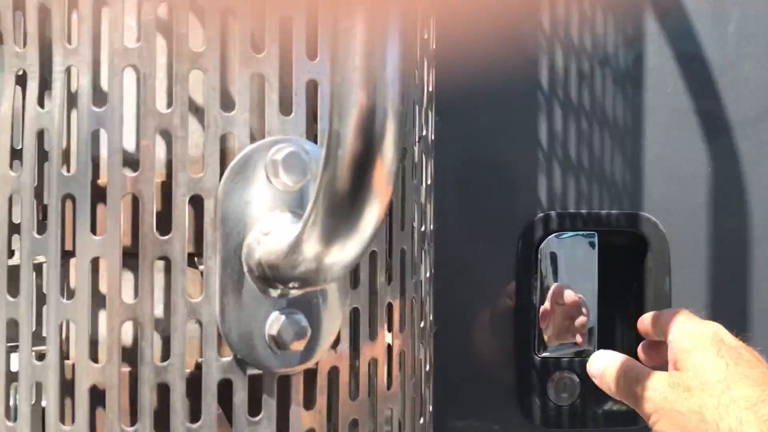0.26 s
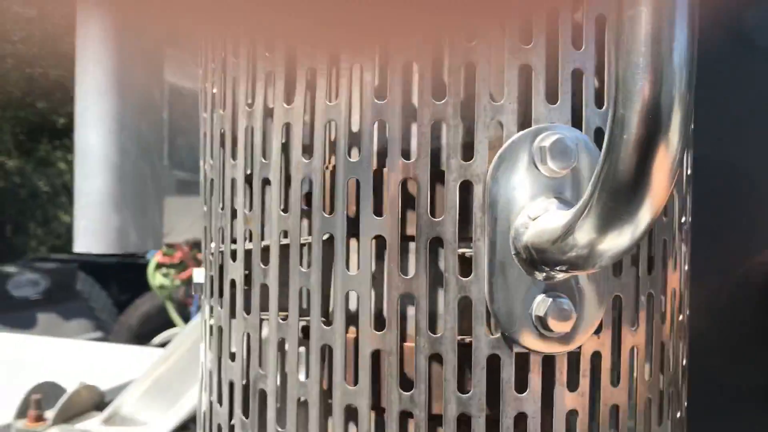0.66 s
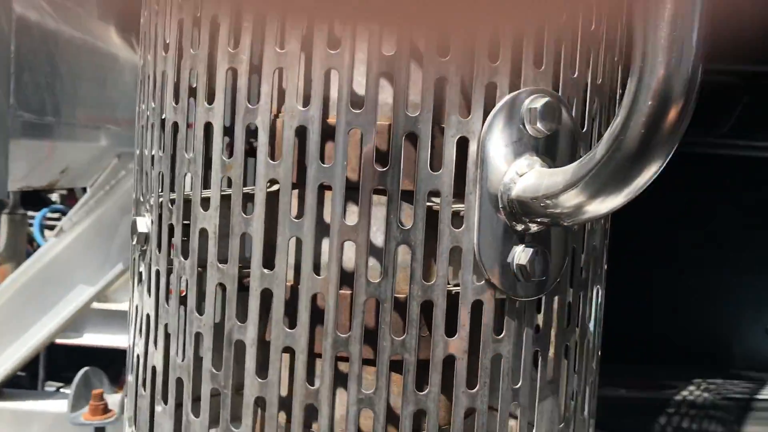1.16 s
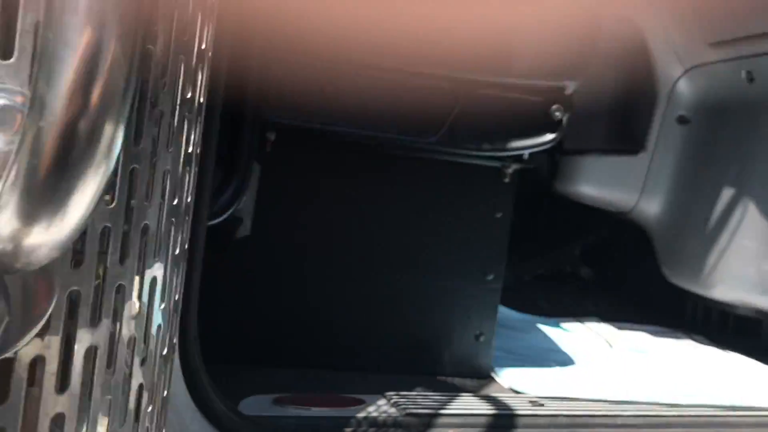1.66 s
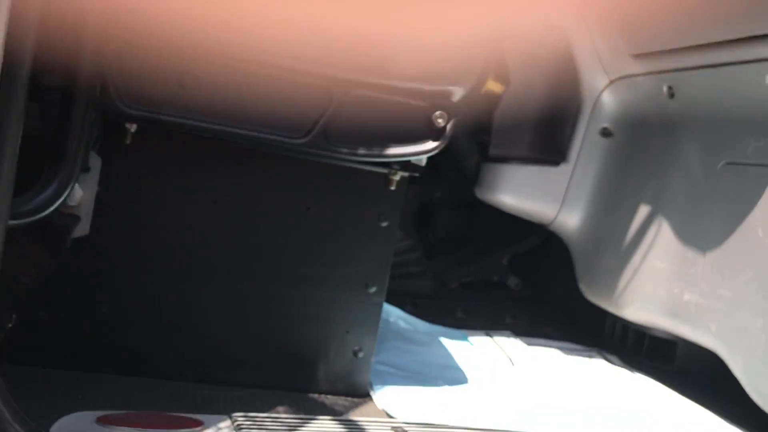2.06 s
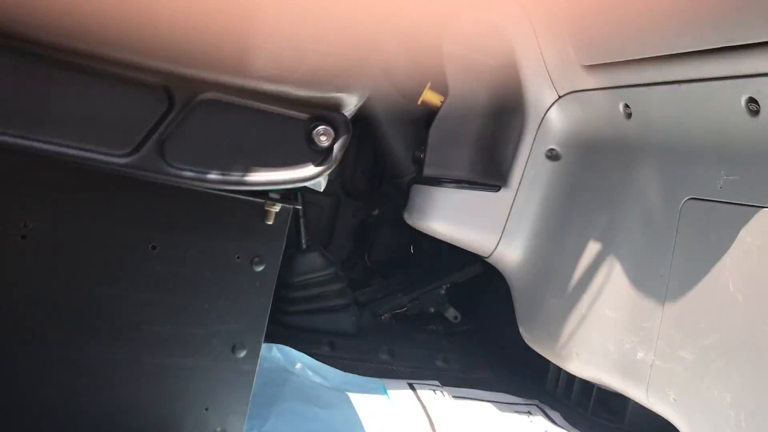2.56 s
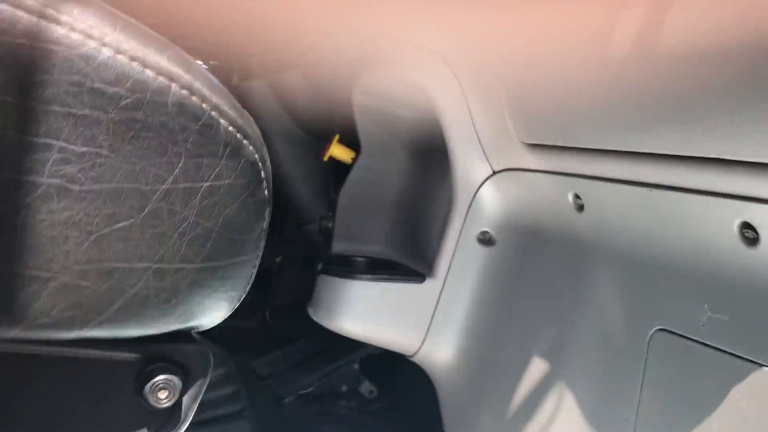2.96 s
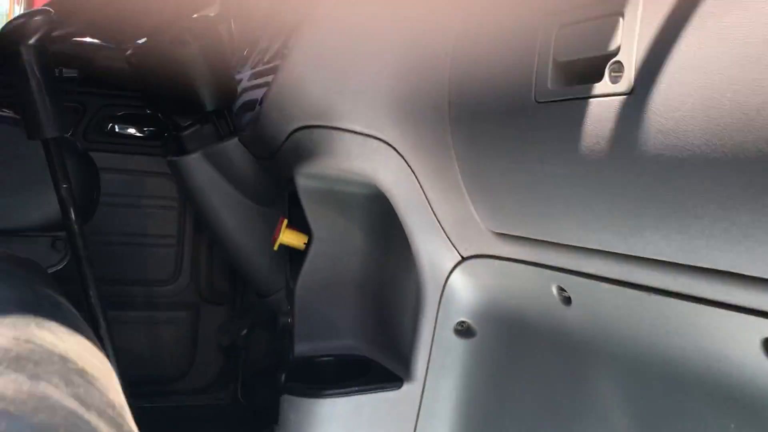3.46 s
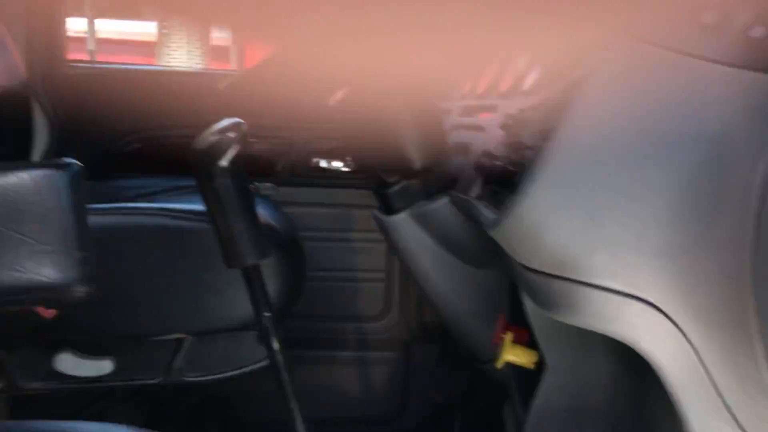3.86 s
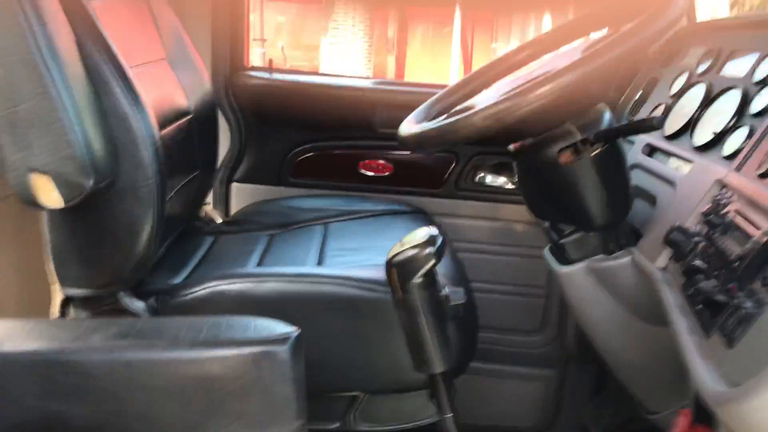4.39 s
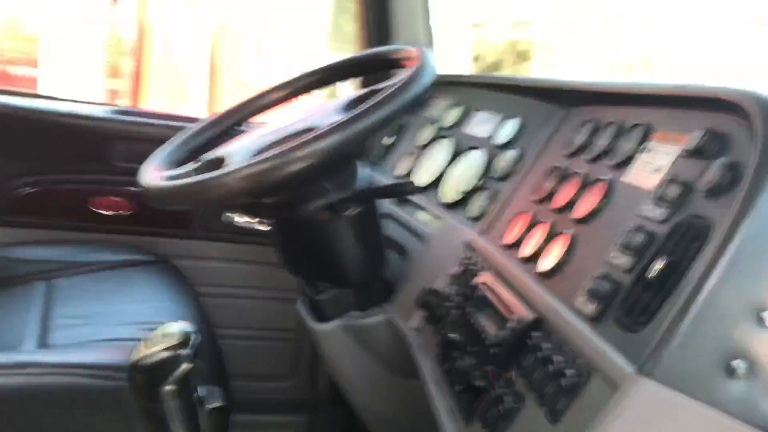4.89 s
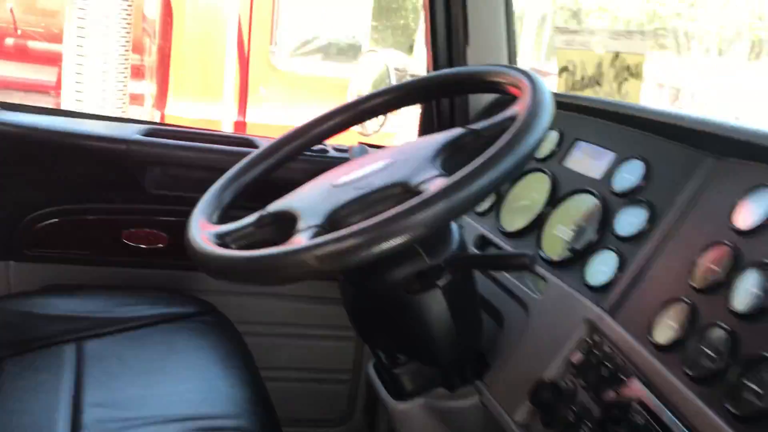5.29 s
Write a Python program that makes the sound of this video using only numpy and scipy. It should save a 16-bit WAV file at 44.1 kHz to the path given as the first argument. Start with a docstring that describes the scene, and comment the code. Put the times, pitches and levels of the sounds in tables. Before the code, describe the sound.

A phone held close hears a person open a truck door and climb in. Low outdoor rumble and soft airy wash run throughout, swelling at times and becoming duller after about 1.5 seconds. Small handle clicks come from 0.2 to 0.6, then a double dull knock near 0.73 and a faint rattle at 0.8. At 1.4 the latch grates and lets go with the loudest, bright steely clack and panel boom. A soft bump follows at 2.0, then a sharp crack at 2.3 and a short gritty scrape around 2.45 to 2.6, the metal step singing and humming on. Clothes and hand rub in uneven strokes, with clicks at 2.7. Dry seat creaks come near 3.1 and 3.5 to 3.7, a trim tap at 3.8 and a brief sole squeak at 4.05. Quieter rubbing, ticks and knocks continue until a low handling thump at 5.45.

```python
"""Climbing into a truck cab

At the open door of a truck, a hand-held phone hears the latch let go and a person climb in. Blows crack and
boom in panels, most also ringing the door steel; a hand thumps the phone at the end. A foot loads the step,
grit scrapes its steel and a sole squeaks. The seat creaks in stick and slip; after a short handle rattle,
clothes and hand rub near the phone in strokes of tiny slips. Filtered noise makes the low outdoor rumble
and wash, which grow duller on the way into the cab."""
import sys
import numpy as np
from scipy import signal
from scipy.fft import rfft, irfft
from scipy.io import wavfile
from scipy.ndimage import uniform_filter1d

SR = 44100
rng = np.random.default_rng(int(sys.argv[2]) if len(sys.argv) > 2 else 0)


def pcm_store(signal):
    """Save signal as 16-bit PCM."""
    levels = np.round(np.clip(np.atleast_2d(signal), -1, 1) * 32767)
    wavfile.write(sys.argv[1], SR, levels.astype(np.int16).T)


N = 244269
T = np.arange(N) / SR  # time in the scene, s
AGE = T[:SR // 2]  # time since a blow, s

# Levels of struck sounds are rms over their first 20 ms; a source's trim comes on top.
# knocks on door, step and cab, and a last low thump of a hand on the phone:
# start_s, panel_pitch_hz, boom_db, knock_db, hardness_db (crack over knock),
# base_t60_s (scaled in each range), door_steel_share (0-1, of power)
KNOCKS = [(0.7294, 128, -33, -34.5, -15, 0.084, 0.04), (0.7494, 178, -33, -34.5, -10, 0.035, 0),
          (1.4196, 173.8, -20, -22, -11.5, 0.063, 0.66), (1.495, 191.4, -37.5, -64, 0, 0.25, 0.1),
          (1.994, 189, -33, -46, -18.5, 0.2, 0.01), (2.0704, 114.3, -42, -51.5, -2.5, 0.14, 0.06),
          (2.305, 160.6, -31.5, -30, -20, 0.037, 0.03), (2.3114, 296, -37, -33.5, -24, 0.048, 0.4),
          (2.7524, 127.7, -34, -42.5, -11, 0.027, 0.2), (2.944, 162, -40.5, -46, -5.5, 0.04, 0.03),
          (3.451, 113.7, -41.5, -31, -17, 0.15, 0.02), (3.822, 118, -43, -43.5, -21, 0.16, 0.6),
          (4.474, 129, -53.5, -50.5, -17, 0.19, 0.3), (4.9, 107.5, -41.5, -48.5, -7, 0.18, 0),
          (4.973, 216, -52, -43.5, -9, 0.033, 0.36), (5.452, 56.3, -33.5, -48, -9, 0.068, 0.63)]
# the blows' crowded modes: pitch_hz, level_db
DOOR_TONE = [(120, -5.5), (200, 2.5), (263, -4), (401, -10.5), (482, -15.5), (590, -12), (916, -26),
             (1080, -24), (1400, -29.5), (1710, -30.5), (2470, -36.5), (2700, -32.5), (3970, -38),
             (6170, -42), (16000, -60)]
# single modes of the door steel: pitch_hz, level_db, t60_s
DOOR_MODES = [(332.2, -2.5, 0.19), (397, -0.5, 0.097), (531, -8.5, 0.14), (585, -11, 0.07),
              (695, -16, 0.087), (864, -5, 0.048), (1008, -7, 0.15), (1147, 0.5, 0.048), (1290, 0.5, 0.084),
              (1583, 1, 0.056), (1793, 4, 0.036), (1930, -8, 0.042), (2090, -30, 0.13), (2520, -28, 0.12),
              (2920, -32, 0.026), (3055, -4, 0.08), (3340, -7, 0.093), (4200, -7, 0.023), (4480, 4, 0.029),
              (6400, 2, 0.035), (6570, -3, 0.054), (7650, -19, 0.03)]
# modes of a broad panel: multiple_of_panel_pitch, level_db, t60_s
PANEL_MODES = [(.69, 0.5, 0.16), (0.972, 7, 0.22), (1.022, 1.5, 0.14), (1.249, 1, 0.16)]
KNOCK_CLACK_SHARE = 0.29  # how much of the hardness reaches the mid-range clack

# latch bolt dragging over its striker
BOLT_START_S, BOLT_LENGTH_S, BOLT_DB, BOLT_ATTACK_S, BOLT_RELEASE_T60_S = 1.402, 0.023, -38.5, 0.01, .025

# bright snaps and pitched taps of catches and trim: start_s, peak_db, centre_hz, width_hz, t60_s
SNAPS = [(0.187, -31, 1350, 686, 0.046), (0.578, -41.5, 3420, 600, 0.049),
         (1.4106, -19.5, 11100, 1760, 0.01), (1.4201, -16.5, 5540, 5030, 0.011),
         (1.4216, -19, 1720, 350, 0.049), (2.295, -32, 3960, 6900, 0.2), (2.305, -21, 11500, 4860, 0.0022),
         (2.3104, -15.5, 10200, 8000, 0.0086), (2.4617, -19.5, 2796, 1790, 0.026),
         (2.939, -32, 11800, 6050, 0.0021), (3.5705, -29.5, 4470, 7040, 0.017),
         (3.706, -34.5, 604, 248, 0.054), (3.824, -29, 1265, 350, 0.31), (4.0425, -26, 2150, 443, 0.038),
         (4.588, -39.5, 4280, 1510, 0.017), (4.7101, -33, 7500, 9000, 0.0056),
         (4.899, -32.5, 1350, 300, 0.15), (4.9005, -39, 2090, 350, 0.086)]
# small clicks of handle, latch and trim: start_s, level_db (before trim),
# brightness_db (step from each range to the next), base_t60_s (scaled in click)
CLICKS = [(0.1682, -44, -0.5, 0.11), (0.19, -44, -7.5, 0.11), (0.228, -47, 5, .044),
          (0.405, -50, -10.5, 0.068), (0.4316, -46.5, -6, 0.13), (0.5649, -46.5, -1.5, 0.045),
          (0.577, -47.5, -2, .04), (0.6713, -47.5, 0, .03), (0.786, -46.5, -8.5, .027),
          (0.965, -40, -3.5, 0.032), (1.024, -47.5, -3.5, 0.076), (1.666, -50, 1, .027),
          (1.9104, -53.5, -13.5, .039), (2.0477, -48, -10.5, 0.042), (2.1645, -49, -3, .06),
          (2.7039, -39.5, -0.5, .029), (2.7243, -39, .5, 0.071), (2.818, -43.5, -4.5, .05),
          (3.211, -46, -7, .08), (3.255, -46, -6.5, 0.051), (4.0411, -37, -6.5, .13),
          (4.6165, -48.5, -5, 0.034), (4.7097, -49.5, -9.5, .025), (4.9748, -41.5, -1, .07),
          (5.3213, -50, 0, .052)]
# tone of those clicks: pitch_hz, level_db
CLICK_TONE = [(300, -9.5), (600, 9.5), (900, 3.5), (1500, 7.5), (2600, -2), (3800, -0.5), (4800, -3.5),
              (6300, -2.5), (9000, -23.5), (12500, -20), (16000, -19)]
CLICK_TRIM_DB = -10.5

# foot on the step: arrival, level and time constant of the load
FOOTFALL_S, FOOTFALL_DB, FOOTFALL_PUSH_S = 2.412, -36.5, 0.028
# low modes of the step: pitch_hz, level_db, t60_s
STEP_MODES = [(121, 2.5, 0.52), (158.7, 5, 0.93), (215, 3.5, 1), (266, -4.5, 0.35), (339, -6, 0.62),
              (467, -11, 0.51)]
# scrape on the steel step: start_s, level_db, step_drone_db (both before trim)
SCRAPE = [(2.404, -53, -50), (2.432, -33, -33), (2.468, -25.5, -33), (2.488, -27, -31.5),
          (2.61, -52.5, -45), (2.7, -62.5, -52)]
# tone of the rasping grit: pitch_hz, level_db
SCRAPE_TONE = [(150, -13), (250, -5), (429, -3), (476, -3.5), (788, -13), (1200, -5.5), (1700, -8.5),
               (2490, -9), (4050, -23), (4650, -16.5), (7980, -29.5), (12500, -39), (16000, -41)]
# singing modes of the scraped steel: pitch_hz, level_db, t60_s
STEEL_MODES = [(1040, 7.5, 0.19), (1180, 1, 0.4), (1258, -0.5, 0.45), (1317, -17, 0.46), (1385, 1, 0.4),
               (1574, 0, .28), (1590, 4.5, .2), (1696, 7, 0.53), (1810, -1, 0.31), (1980, -8, 0.39),
               (2000, -3, 0.26), (2050, -3, 0.36), (2180, -28, .3), (2460, -10, .25), (2440, 13.5, 0.096),
               (2650, 5, 0.12), (2753, -13, 0.18), (2950, -5, 0.15), (3390, -2, 0.21), (3440, -4, 0.24)]

# a sole squeaks as it slides in: start_s, level_db (before trim)
SLIDE = [(3.965, -60), (4.0, -43.5), (4.045, -36), (4.07, -39.5), (4.12, -62)]
# resonances of the sole: pitch_hz, half_width_hz, level_db
SOLE_MODES = [(619, 9.9, -0.5), (1370, 20, 1), (2010, 81, 3.5), (3420, 47, 1), (4580, 18, -7),
              (6200, 110, -30)]

# creaks of the seat: start_s, length_s, level_db, sizzle_db (both before trim)
CREAKS = [(3.091, .062, -43.5, -55), (3.5107, .004, -39.5, -45.5), (3.5493, .004, -37.5, -44.5),
          (3.571, .004, -42, -45.5), (3.589, .004, -38, -41.5), (3.6732, .014, -40.5, -44.5),
          (3.7274, .004, -41.5, -44.5)]
# tone of one seat slip: pitch_hz, level_db
SEAT_TONE = [(350, -42), (600, 4), (779, -8), (957, -13), (1370, 5.5), (1550, -7), (1850, -3), (3390, -17),
             (5190, -7.5), (7620, -17), (9110, -11.5), (10200, -30), (16000, -15)]
# typical gap between slips, its log spread, spread of slip level, trim
SLIP_GAP_S, SLIP_JITTER, SLIP_SCATTER_DB, SLIP_TRIM_DB = .009, .2, 1, -4.5

# strokes of clothes and hand, and a first short rattle of the handle:
# start_s, length_s, pressure_db, rasp_db, hiss_db (levels before trim)
RUBS = [(0.811, 0.043, -41.5, -61, -77), (2.013, 0.24, -69, -66, -66.5), (2.332, .08, -48, -54.5, -53.5),
        (2.585, 0.028, -43, -46, -51.5), (2.71, 0.053, -36, -44, -46), (2.773, .05, -48, -54.5, -58),
        (2.956, 0.15, -57, -64.5, -66), (3.116, 0.24, -53.5, -55, -56.5), (3.544, 0.05, -41.5, -47.5, -53),
        (3.682, 0.21, -42.5, -57, -61), (3.847, 0.081, -37.5, -44.5, -52), (3.934, 0.14, -39, -48, -60),
        (4.138, 0.043, -56, -55, -59.5), (4.196, 0.81, -61, -64, -64.5), (4.405, 0.083, -59, -59, -57.5),
        (4.464, 0.031, -45, -63, -66), (5.312, 0.021, -39.5, -46, -49), (5.345, 0.13, -48, -49, -51.5)]
# tone of the strokes and rattle: pitch_hz, level_db
RUB_TONE = [(88, -33.5), (150, 2.5), (286, -14.5), (457, -11), (524, -15.5), (716, -17.5), (1120, -20),
            (1600, -22), (1830, -24.5), (2810, -32), (4950, -33), (5460, -32.5), (12400, -39.5),
            (16000, -38.5)]
RUB_ATTACK_S, RUB_RELEASE_T60_S = 0.015, 0.19

# faint ticks of loose trim; level before the click trim, spread to either side
TICKS_PER_S, TICK_DB, TICK_SPREAD_DB = 6, -59.5, 3
TICK_BRIGHT_DB, TICK_BASE_T60_S = -2, .025

# echoes off nearby panels and glass: delay_s, level_db
ECHOES = [(.0023, -23.5), (.0037, -19.5), (.0061, -12), (.0089, -9.5), (.0127, -13), (.0173, -12),
          (0.024, -17.5)]

# low rumble swells as the door swings, the cab takes weight and a hand moves the phone:
# centre_s, half_width_s, level_db (before trim)
SWELLS = [(0.16, 0.11, -46), (0.72, 0.088, -39.5), (1.68, 0.092, -43), (2.33, 0.075, -45),
          (2.85, 0.31, -46.5), (3.54, 0.065, -45), (3.9, 0.16, -42.5), (5.49, 0.067, -39.5)]
# tone of the low rumble: pitch_hz, level_db
RUMBLE_TONE = [(12, -60), (20, -16), (38, -0.5), (59, 2), (80, 0.5), (121, -1), (151, -8.5), (178, -14),
               (210, -13.5), (280, -22.5), (360, -37), (620, -120)]
# air of the yard: pitch_hz, level_db
YARD_TONE = [(120, -17), (200, -7.5), (328, -9), (424, -14), (491, -14.5), (777, -16), (1350, -15),
             (2210, -25), (3430, -23.5), (3690, -25.5), (16000, -37)]
RUMBLE_DB, RUMBLE_TRIM_DB = -49, 2.5  # steady level before trim; the trim also lifts the swells
WASH_DB, HISS_DB = -55.5, -68
# change of each steady outdoor part over the way into the cab
ENTER_START_S, ENTER_END_S = 1.5, 6.1
SHELTER_RUMBLE_DB, SHELTER_WASH_DB, SHELTER_HISS_DB = -2, -7.5, -5.5

TOP_HZ = 15850  # upper limit of the phone


def knocks():
    """Each blow cracks at once and sets a panel booming; most also ring the door steel."""
    out = np.zeros(N)
    for start, hz, boom_db, knock_db, hard_db, t60, share in KNOCKS:
        share = np.clip(share, 0, 1)
        steel = ring(DOOR_MODES)
        blow = struck(panel(hz), boom_db)
        # harder blows are brighter
        clack_db = knock_db + KNOCK_CLACK_SHARE * hard_db
        crack_db = knock_db + hard_db
        # the crowded modes live longest in the lowest range
        layers = [(266, 940, knock_db, t60 * 2.5),
                  (890, 2090, clack_db, t60 * 1.24),
                  (2200, 22000, crack_db, t60 * 1.6)]
        for lo, hi, db, life in layers:
            crowd = colour(burst(life, tail_db=-15, tail_t60=0.22), DOOR_TONE)
            blow = blow + np.sqrt(1 - share) * struck(band(crowd, lo, hi), db)
            blow = blow + np.sqrt(share) * struck(band(steel, lo, hi), db)
        add(out, start, blow)
    return out


def panel(hz):
    """A broad panel is pushed from rest, so its boom builds up over some milliseconds."""
    swing = sum(undb(db) * np.sin(2 * np.pi * hz * ratio * AGE) * fade(t60) for ratio, db, t60 in PANEL_MODES)
    return swing * (1 - np.exp(-AGE / 0.0091))


def bolt():
    """Steel grates finely on steel as the latch lets go."""
    drag = stroke(BOLT_START_S, BOLT_LENGTH_S, BOLT_ATTACK_S, BOLT_RELEASE_T60_S)
    grating = unit(band(rng.standard_normal(N), 810, 7200, order=1))
    return undb(BOLT_DB) * drag * grating


def snaps():
    """A catch or a piece of trim lets go and rings around one pitch."""
    out = np.zeros(N)
    for start, db, hz, width, t60 in SNAPS:
        crowd = burst(t60, tail_db=-21.0, tail_t60=0.12)
        snap = band(crowd, max(hz - width / 2, 100), hz + width / 2, order=2)
        add(out, start, undb(db) * snap / np.abs(snap).max())
    return out


def clicks():
    """The clear clicks of handle, latch and trim, each a short burst of modes."""
    out = np.zeros(N)
    for start, db, bright_db, t60 in CLICKS:
        add(out, start, click(db, bright_db, t60))
    return out


def click(db, bright_db, t60):
    """Small hard parts tap together and ring briefly beside the panels."""
    tap = cab(colour(burst(t60 * 0.82, tail_db=-26, tail_t60=0.24), CLICK_TONE))
    clack, crack, sizzle = ranges(tap, 420)
    mix = struck(clack, db - bright_db) + struck(crack, db) + struck(sizzle, db + bright_db)
    return undb(CLICK_TRIM_DB) * mix


def footfall():
    """Weight comes gradually onto the step, which hums on in its low modes."""
    age = np.maximum(T - FOOTFALL_S, 0)
    hum = np.zeros(N)
    for hz, db, t60 in STEP_MODES:
        hum += undb(db) * np.sin(2 * np.pi * hz * age) * np.exp(-np.log(1000) * age / t60)
    return undb(FOOTFALL_DB) * hum * (1 - np.exp(-age / FOOTFALL_PUSH_S))


def scrape():
    """Grit drags in jerks over the steel step: it rasps, the metal sings on and the step drones."""
    force, weight = gains(SCRAPE)
    grit = friction(rate=2000, spread_db=2) * undb(2 * walk(160))
    rasp = unit(cab(colour(grit, SCRAPE_TONE))) * force
    steel = ring(STEEL_MODES)
    sing = signal.fftconvolve(grit * force, steel / np.linalg.norm(steel))[:N]
    drone = unit(signal.fftconvolve(grit, ring(STEP_MODES))[:N]) * weight
    return undb(-3.0) * rasp + undb(-6.5) * sing + undb(0.5) * drone


def sole():
    """Rubber chatters over the floor and excites resonances that each waver on their own."""
    chatter = friction(rate=2200, spread_db=-2.0)
    squeak = np.zeros(N)
    for hz, half_width, db in SOLE_MODES:
        tone = unit(band(chatter, max(hz - half_width, 100), hz + half_width, order=1))
        squeak += undb(db + 1.3 * walk(60)) * tone
    return undb(1.5) * unit(squeak) * gains(SLIDE)[0]


def seat():
    """Upholstery sticks and slips at uneven gaps, every slip ringing the same broad resonances."""
    out = np.zeros(N)
    for start, length, db, sizzle_db in CREAKS:
        s = start
        while s < start + length:
            slip = colour(burst(0.031, tail_db=-8.5, tail_t60=0.23), SEAT_TONE)
            size = undb(SLIP_TRIM_DB + SLIP_SCATTER_DB * rng.standard_normal())
            creak = struck(band(slip, 562, 9300), db)
            sizzle = struck(band(slip, 7570, 13300), sizzle_db)
            add(out, s, size * (creak + sizzle))
            s += SLIP_GAP_S * np.exp(SLIP_JITTER * rng.standard_normal())
    return out


def rubbing():
    """After a short handle rattle, clothes and hand drag in uneven strokes; all are made of tiny slips."""
    slips = friction(rate=6000, spread_db=3) * undb(2.03 * walk(70))
    fibres = cab(colour(slips, RUB_TONE))
    # firm pressure is dull, light contact hisses
    body, middle, top = map(unit, ranges(fibres, 174))
    power = np.zeros((3, N))  # overlapping strokes add in power
    for start, length, *levels_db in RUBS:
        power += np.outer(undb(levels_db), stroke(start, length, RUB_ATTACK_S, RUB_RELEASE_T60_S)) ** 2
    pressure, rasp, hiss = np.sqrt(power)
    return undb(-2) * pressure * body + undb(-2.5) * rasp * middle + undb(-4.0) * hiss * top


def ticks():
    """Loose trim ticks faintly at random moments."""
    out = np.zeros(N)
    for when, size in rng.random((int(TICKS_PER_S * N / SR), 2)):
        db = TICK_DB + TICK_SPREAD_DB * (2 * size - 1)
        add(out, when * T[-1], click(db, TICK_BRIGHT_DB, TICK_BASE_T60_S))
    return out


def outdoors():
    """Low rumble that wavers and swells, under wash and hiss; the steady parts sink on the way into the cab."""
    inside = np.clip((T - ENTER_START_S) / (ENTER_END_S - ENTER_START_S), 0, 1)
    swells = sum((undb(db) * np.exp(-.5 * ((T - s) / width) ** 2)) ** 2 for s, width, db in SWELLS)
    # steady part and swells add in power
    weight = np.sqrt(undb(RUMBLE_DB + SHELTER_RUMBLE_DB * inside) ** 2 + swells)
    low = unit(band(colour(rng.standard_normal(N), RUMBLE_TONE), 31.4, 440, order=2))
    rumble = undb(RUMBLE_TRIM_DB) * low * undb(.5 * walk(8)) * weight
    air = colour(rng.standard_normal(N), YARD_TONE)
    wash = unit(band(air, 244, 2390)) * undb(WASH_DB + SHELTER_WASH_DB * inside + .5 * walk(17))
    hiss = unit(band(air, 3200, 18000)) * undb(HISS_DB + SHELTER_HISS_DB * inside)
    return rumble + wash + hiss


def cab(x):
    """Close echoes comb the sound into fine peaks and dips."""
    out = x.copy()
    for delay, db in ECHOES:
        add(out, delay, undb(db) * x)
    return out


def burst(t60, tail_db, tail_t60):
    """Crowded modes, as decaying noise, with the weaker reflections of the cab."""
    return rng.standard_normal(len(AGE)) * (fade(t60) + undb(tail_db) * fade(tail_t60))


def ring(modes):
    """Impulse response of damped modes, each starting at its own point of the swing."""
    return sum(undb(db) * np.sin(2 * np.pi * (hz * AGE + rng.random())) * fade(t60) for hz, db, t60 in modes)


def friction(rate, spread_db):
    """Dense tiny slips of uneven size, at this mean rate per second."""
    sizes = undb(spread_db * np.minimum(rng.exponential(size=N), 4))
    slips = rng.random(N) < rate / SR
    return unit(slips * rng.choice([-1, 1], N) * sizes)


def stroke(start, length, attack, release_t60):
    """Envelope of a drag: it builds up, holds and dies away."""
    rise = np.clip((T - start) / max(attack, 1e-3), 0, 1)
    return rise * np.exp(-np.log(1000) * np.maximum(T - start - length, 0) / max(release_t60, 1e-3))


def fade(t60):
    """Exponential decay by 60 dB in t60 seconds."""
    return np.exp(-np.log(1000) * AGE / max(t60, 1e-3))


def walk(rate):
    """Smoothed random steps, rate of them per second, with a spread near 1."""
    k = int(SR / rate)
    steps = np.repeat(rng.standard_normal(N // k + 1), k)
    return unit(uniform_filter1d(steps, k)[:N])


def gains(rows):
    """Gain curves from rows of start_s and levels in dB, silent outside their span."""
    s, *columns = np.transpose(rows)
    return [undb(np.interp(T, s, c, left=-150, right=-150)) for c in columns]


def colour(x, points):
    """Causal minimum-phase filter through (Hz, dB) points, built from the cepstrum."""
    hz, db = np.transpose(points)
    size = 2 ** 13
    grid = np.maximum(np.fft.rfftfreq(size, 1 / SR), 1)
    cepstrum = irfft(np.log(undb(np.interp(np.log(grid), np.log(hz), db))))
    # folding the cepstrum forward gathers the response at its start
    cepstrum[1:size // 2] *= 2
    cepstrum[size // 2 + 1:] = 0
    return signal.fftconvolve(x, irfft(np.exp(rfft(cepstrum))))[:len(x)]


def band(x, lo, hi, order=3):
    """Causal band-pass, its upper edge held below half the sample rate."""
    sos = signal.butter(order, [lo, min(hi, .48 * SR)], "band", fs=SR, output="sos")
    return signal.sosfilt(sos, x + 1e-18)


def ranges(x, lowest):
    """Split a sound into body, upper middle and top."""
    return band(x, lowest, 2000), band(x, 2200, 8000), band(x, 8000, 17000)


def undb(db):
    """Decibels to gain."""
    return 10 ** (np.asarray(db) / 20)


def unit(x):
    """Scale to rms 1."""
    return x / np.sqrt(np.mean(x ** 2))


def struck(x, db):
    """Scale a blow so that its first 20 ms have this level."""
    return x * undb(db) / np.sqrt(np.mean(x[:SR // 50] ** 2))


def add(out, s, x):
    """Mix a sound in at time s."""
    i = int(s * SR)
    out[i:i + len(x)] += x[:len(out) - i]


def scene():
    """Everything at the one microphone."""
    blows_and_latch = knocks() + bolt() + snaps() + clicks()
    climbing = footfall() + scrape() + sole() + seat() + rubbing()
    return (blows_and_latch + climbing + ticks() + outdoors())[None]


def record(dry):
    """The phone cuts the top with a steep low-pass."""
    return signal.sosfilt(signal.ellip(10, .2, 80, TOP_HZ, fs=SR, output="sos"), dry)


dry = scene()
out = record(dry)
pcm_store(out)
```